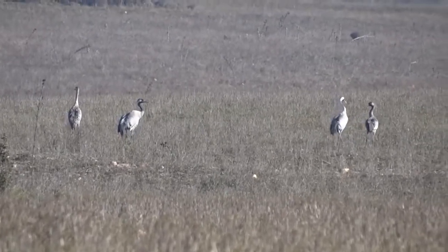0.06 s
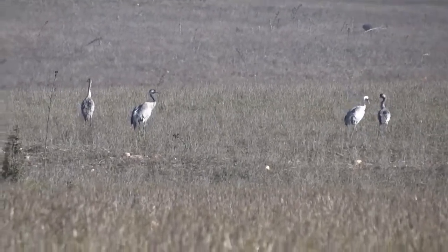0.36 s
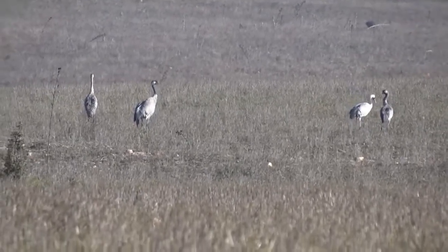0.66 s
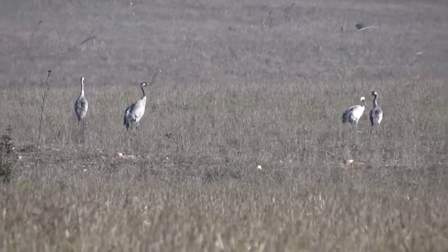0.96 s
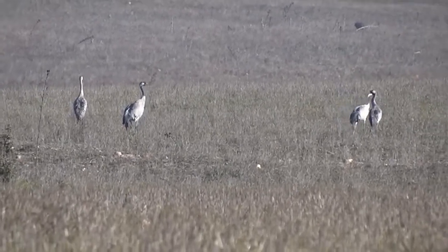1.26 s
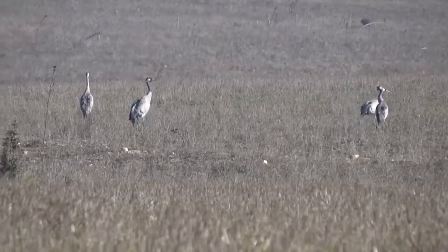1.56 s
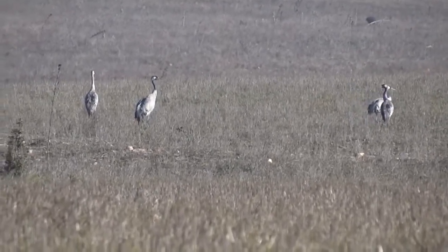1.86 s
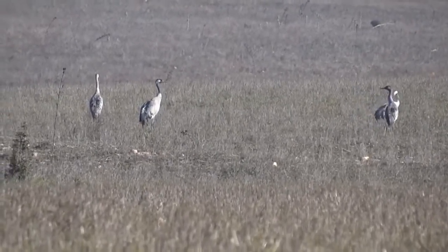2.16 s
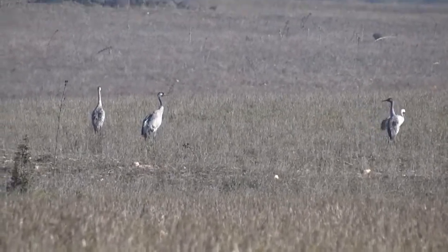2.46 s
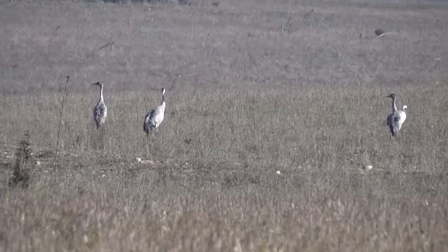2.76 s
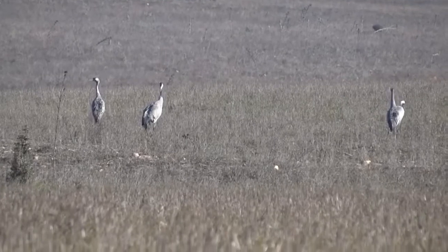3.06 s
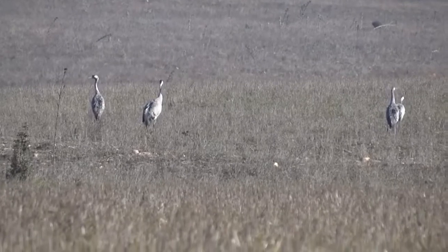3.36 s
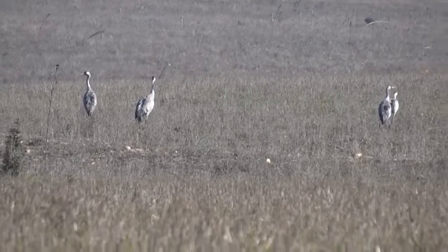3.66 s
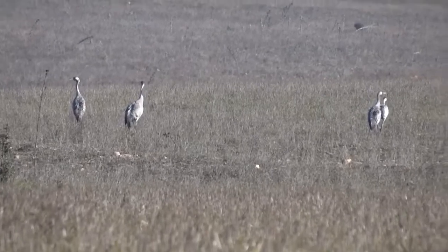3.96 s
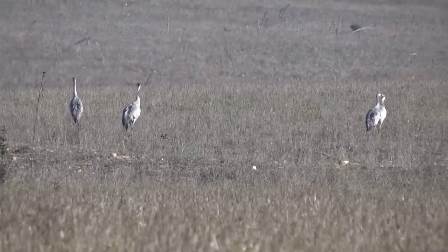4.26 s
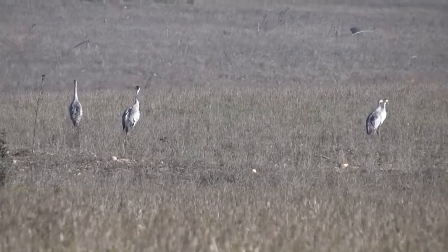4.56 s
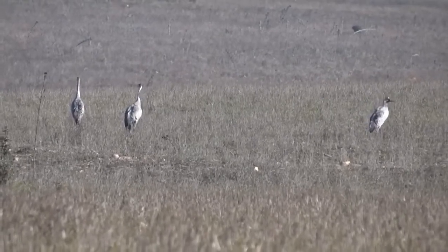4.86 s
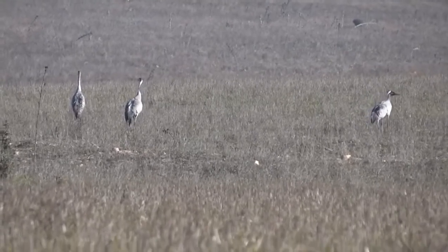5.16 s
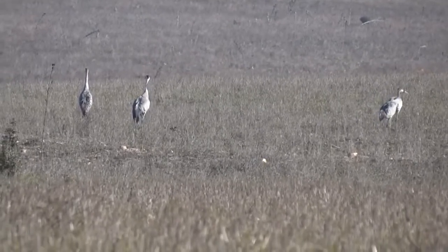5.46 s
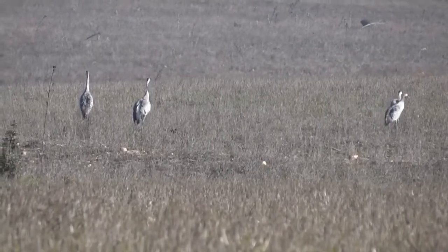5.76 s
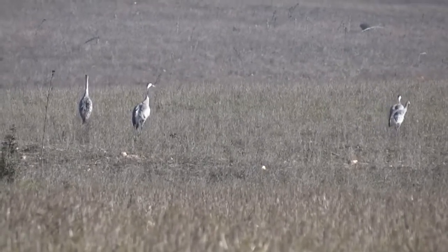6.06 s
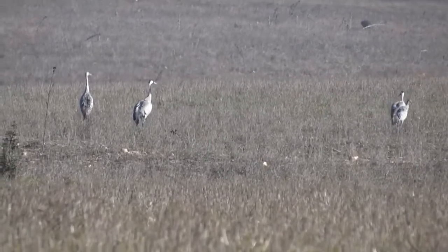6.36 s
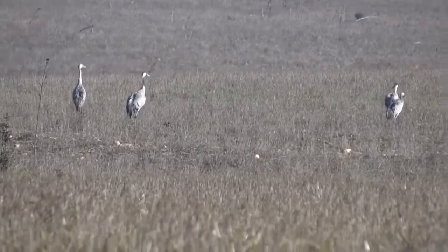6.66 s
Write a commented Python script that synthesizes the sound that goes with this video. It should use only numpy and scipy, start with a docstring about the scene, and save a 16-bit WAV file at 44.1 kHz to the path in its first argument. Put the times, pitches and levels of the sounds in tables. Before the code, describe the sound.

A crane clucks harshly in pairs and short rattles in an open field, while a lark and small birds whistle further off.

```python
"""A ground bird clucks harshly in an open field, in pairs and in rattles, just overloading the microphone. Its
voice is a source and a filter: uneven membrane slaps ring the throat, and turbulent air adds a rasp. A lark
whistles arched, nearly pure tones, and small birds chirp, tick and buzz further off; all of these sound again,
the same, 4.2 s later. The field scatters the calls back, over a thin twitter and a faint hiss."""
import sys
import numpy as np
from scipy import signal
from scipy.fft import rfft, irfft
from scipy.io import wavfile
from scipy.ndimage import uniform_filter1d, map_coordinates

SR = 44100
rng = np.random.default_rng(int(sys.argv[2]) if len(sys.argv) > 2 else 0)


def write(x):
    x = np.atleast_2d(x).T
    wavfile.write(sys.argv[1], SR, np.round(np.clip(x, -1, 1) * 32767).astype(np.int16))


N = 305172
TIME = np.arange(N) / SR

# spectrum of the background air: frequency_hz, relative_density_db
AIR_SPECTRUM = [(30, -30), (240, -25), (310, -21), (410, -9.5), (560, -16.5), (800, -4), (1200, -1),
                (1750, -7), (2100, -13.5), (3200, -14), (4200, -15), (4780, -4.5), (5200, -14.5),
                (5900, -16.5), (7600, -25.5), (15500, -24.5)]
# bands of far-off birds: centre_hz, width_hz, level_db
CHORUS_BANDS = [(1035, 87, -43), (1397, 150, -46), (1644, 90, -45.5), (3870, 320, -57)]
# falling chirps: start_s, length_s, middle_hz, level_db
CHIRPS = [(0.009, 0.032, 4990, -33), (1.65, 0.0198, 4140, -31.5), (2.251, 0.029, 3950, -26),
          (2.974, .035, 4785, -15)]
# dry ticks: time_s, level_db
TICKS = [(0.038, -28), (.527, -30.5), (0.588, -29), (.675, -40), (.718, -34), (.788, -37), (.925, -30.5),
         (.967, -42), (2.372, -38), (3.737, -38)]
# buzzy notes: start_s, length_s, centre_hz, width_hz, level_db
BUZZES = [(0.26, 0.11, 4970, 2300, -37), (2.567, 0.015, 5964, 700, -39.5), (2.568, 0.047, 3640, 592, -39.5),
          (2.572, .036, 5070, 1187, -42.5), (3.819, 0.054, 6180, 1100, -37.5)]
# the lark's arches (bow under 1 is pointed, over 1 flat-topped; top_db precedes the beak resonance):
# start_s, rise_s, fall_s, first_hz, top_hz, last_hz, bow, top_db
LARK_NOTES = [(1.162, .033, 0.11, 2820, 2798, 2326, .5, -22),
              (1.316, 0.019, .012, 3253, 3680, 3470, 1.4, -32),
              (1.362, 0.031, 0.057, 3170, 3625, 2315, 3.13, -13),
              (1.453, 0.054, 0.12, 2400, 3274, 2756, 1.3, -18),
              (2.899, 0.025, 0.069, 3260, 3587, 2387, .85, -16.5),
              (3.1, 0.03, .016, 2510, 3180, 2712, 1.092, -18),
              (3.143, 0.017, 0.032, 2660, 3020, 2550, 2.2, -23),
              (3.239, 0.016, .08, 3710, 5180, 2520, .62, -4.5),
              (3.336, .046, 0.061, 2573, 3467, 2445, 5.5, -16),
              (3.502, 0.037, 0.034, 3490, 4354, 3380, 0.88, -10.5),
              (3.575, .05, .042, 3300, 3750, 2430, 1.5, -19.5)]

# the ground bird's throat resonances at the neutral voicing: centre_hz, width_hz, gain_db
THROAT_MODES = [(700, 154, -16), (872.5, 130, -9.5), (1169.6, 131.5, 10), (1339, 190, -4.5),
                (1514, 217, 5.5), (1639, 55, -13), (1698, 110, -24)]
NEUTRAL_HZ = 1290  # a voicing above this raises and brightens the throat resonances
# upper resonances that the rasp excites: centre_hz, width_hz, gain_db
RASP_MODES = [(2644, 890, -2), (3380, 370, 7), (3950, 250, -4.5), (5440, 340, 3), (5873, 350, 3)]
# double clucks (here and below, levels and rasps are relative from call to call):
# start_s, gap_s, length_s, level_db, second_level_db, rasp_db, voicing_hz, swell_db
CLUCK_PAIRS = [(0.06, .114, 0.024, -6.5, -9.5, -29, 1342, -7.5),
               (.619, .129, 0.022, -12.5, -10.5, -32, 1255, 4),
               (2.125, 0.11, .028, -9, -8.5, -28, 1274, 3.5),
               (2.664, 0.11, 0.025, -7, -8.5, -29.5, 1295, -3),
               (3.912, 0.12, 0.028, -7.5, -10.5, -26, 1320, 5),
               (4.452, .108, 0.025, -7, -9, -25.5, 1270, 0.5),
               (5.672, 0.11, 0.025, -5.5, -5.5, -27, 1403, 3),
               (6.151, .101, .031, -7, -8.5, -23.5, 1276, 0.5)]
# hard single clucks before a rattle: start_s, length_s, level_db, rasp_db, swell_db, voicing_hz
LEAD_INS = [(1.066, 0.038, -11.5, -28.5, 0, 1210), (1.31, 0.038, -9.5, -27, -5, 1253),
            (1.488, .023, -8, -20, 3, 1258), (3.04, .027, -8, -25.5, 0, 1234),
            (3.214, 0.028, -8, -17.5, -10, 1312), (4.834, .033, -8.5, -23.5, 0.5, 1213),
            (4.998, 0.032, -9.5, -15.5, -5.5, 1315), (6.453, .036, -6, -18.5, -9.5, 1290)]
# long, beating calls: start_s, length_s, level_db, rasp_db, swell_db, voicing_hz
RATTLES = [(1.612, .11, -11.3, -22, -1.5, 1290), (3.367, .14, -10, -21, -1, 1297),
           (5.145, .14, -10, -18.5, 5, 1262), (6.59, .15, -9, -18.5, 10.5, 1359)]


def undb(db):
    """Decibels to amplitude ratio."""
    return 10 ** (np.asarray(db) / 20)


def unit(x):
    """Normalisation to rms 1."""
    return x / np.sqrt(np.mean(x ** 2) + 1e-18)


def add(track, start_s, sound):
    """Superposition: a sound sums into a track from its start on."""
    i = max(int(start_s * SR), 0)
    track[i:i + len(sound)] += sound[:N - i]


def band(x, low_hz, high_hz, order=2):
    """Butterworth band-pass filtering."""
    return signal.sosfilt(signal.butter(order, [low_hz, high_hz], "bandpass", fs=SR, output="sos"), x)


def resonate(x, hz, width_hz):
    """Resonance: two like resonators in cascade, with gain 1 at the centre."""
    peak = signal.iirpeak(hz, hz / width_hz, fs=SR)
    return signal.lfilter(*peak, signal.lfilter(*peak, x))


def wander(rate_hz, size):
    """Random modulation: smoothed noise of spread near 1."""
    hold = int(SR / rate_hz)
    steps = np.repeat(rng.standard_normal(size // hold + 1), hold)
    return 1.3 * uniform_filter1d(uniform_filter1d(steps, hold), hold)[:size]


def bend(x, speed):
    """Time warping slides all frequencies of a sound together."""
    return map_coordinates(x, [np.cumsum(speed)], order=3, mode="mirror")


def air(level_db=-40):
    """Spectrally shaped noise: the steady hiss of open air."""
    hz, db = np.transpose(AIR_SPECTRUM)
    colour = undb(np.interp(np.log(np.fft.rfftfreq(N, 1 / SR) + 1), np.log(hz), db))
    return undb(level_db) * unit(irfft(rfft(rng.standard_normal(N)) * colour, N))


def far_chorus(flicker_db=5.5):
    """Amplitude-modulated noise bands: far-off birds merge into a flickering blur."""
    out = np.zeros(N)
    for hz, width_hz, db in CHORUS_BANDS:
        blur = band(rng.standard_normal(N), hz - width_hz / 2, hz + width_hz / 2)
        out += undb(db) * unit(blur * undb(flicker_db * wander(16, N)))
    return out


def air_absorption(x, cutoff_hz):
    """Absorption over distance takes the treble off a sound."""
    return signal.sosfilt(signal.butter(7, cutoff_hz, fs=SR, output="sos"), x)


def with_scatter(x, near_db, near_t60_s, far_db, far_t60_s, build_s=0.0035):
    """Scattering: decaying echoes from near grass and bushes and the far slope join the direct sound."""
    t = TIME[:2 * SR]
    response = np.zeros(len(t))
    for db, t60_s in ((near_db, near_t60_s), (far_db, far_t60_s)):
        envelope = undb(-60 * t / t60_s) * (1 - np.exp(-t / build_s))
        response += undb(db) * unit(rng.standard_normal(len(t)) * envelope) / np.sqrt(len(t))
    return x + signal.fftconvolve(x, response)[:N]


def whistle(hz, waver=0.0041, second_db=-19, third_db=-31):
    """Nearly sinusoidal oscillation with faint harmonics; the second weakens on high notes."""
    phase = 2 * np.pi * np.cumsum(hz * (1 + waver * wander(330, len(hz)))) / SR
    octave_db = second_db - 36 * np.log2(np.maximum(hz / 2400, 1))
    overtones = undb(octave_db) * np.sin(2 * phase) + undb(third_db) * np.sin(3 * phase)
    return np.sqrt(2) * (np.sin(phase) + overtones)


def glide(length_s, first_hz, middle_hz, last_hz, db):
    """Frequency modulation: a short whistle follows a parabola through three pitches."""
    progress = np.linspace(0, 1, int(length_s * SR))
    hz = np.polyval(np.polyfit([0, .5, 1], [first_hz, middle_hz, last_hz], 2), progress)
    return undb(db) * whistle(hz) * np.sin(np.pi * progress)


def chirp(length_s, hz, db, fall=0.163):
    """A linear sweep, from a fraction above the middle pitch to as far below it."""
    return glide(length_s, hz * (1 + fall), hz, hz * (1 - fall), db)


def twitter(count=135, length_s=.024, level_db=-43, spread_db=5, pitch_hz=4750):
    """Jittered sweeps: tiny falling notes of far-off songbirds, every third from a lower voice."""
    out = np.zeros(N)
    for k, (when, detune, drop, strength) in enumerate(rng.uniform(-1.1, 1, (count, 4))):
        voice_ratio, voice_db = (.8, -2) if k % 3 == 0 else (1, 0)
        hz = voice_ratio * pitch_hz * (1 + .07 * detune)
        note = chirp(length_s, hz, level_db + voice_db + spread_db * strength, fall=.07 + .04 * drop)
        add(out, (k + .5 + when / 2) / count * N / SR, note)
    return out


def buzz(length_s, hz, width_hz, db, climb=0.27):
    """Fast amplitude modulation roughens a band of noise as it climbs in pitch."""
    size = int(length_s * SR)
    noise = band(rng.standard_normal(size), hz - width_hz / 2, hz + width_hz / 2, order=4)
    rough = noise * undb(4.4 * wander(113, size))
    rising = bend(rough, 1 + climb * np.linspace(-.5, .5, size))
    return undb(db) * unit(rising * signal.windows.tukey(size, .5))


def small_birds(run_start_s=1.9, run_step_s=.0915):
    """Sweeps and noise bands further out: chirps, an even run of them, a scoop, ticks and buzzes."""
    out = np.zeros(N)
    for start_s, *note in CHIRPS:
        add(out, start_s, chirp(*note))
    for k in range(4):
        add(out, run_start_s + k * run_step_s, chirp(length_s=0.0159, hz=3950, db=-33.5))
    scoop = glide(length_s=.045, first_hz=4500, middle_hz=3440, last_hz=5270, db=-28)
    add(out, .996, scoop)
    for time_s, db in TICKS:  # an upward flick this fast is heard as a tick
        add(out, time_s - .003, glide(0.00496, 5150, 5580, 7550, db))
    for start_s, *note in BUZZES:
        add(out, start_s, buzz(*note))
    return out


def repeated(song, period_s=4.198):
    """Repetition: the song sounds again one period later."""
    out = song.copy()
    add(out, period_s, song)
    return out


def arch(rise_s, fall_s, first_hz, top_hz, last_hz, bow):
    """The pitch contour of a note: a cosine-power rise and a power-law fall."""
    up = np.cos(np.linspace(0, np.pi / 2, int(rise_s * SR))) ** (2 * np.sqrt(bow))
    down = np.linspace(0, 1, int(fall_s * SR)) ** bow
    return top_hz + np.concatenate([(first_hz - top_hz) * up, (last_hz - top_hz) * down])


def beak_gain(hz, centre_hz=4360, width_hz=150, peak_db=8):
    """Resonance: the whistle blooms where its pitch crosses that of the beak."""
    return undb(peak_db / (1 + ((hz - centre_hz) / (width_hz / 2)) ** 2))


def lark(db_per_octave=25, fade_db=1, slur_s=.009, attack_s=0.01, ceiling_db=-6.5,
         quaver_start_s=3.573, quaver_rate_hz=54, quaver_depth_hz=330):
    """Pitch and level rise together with pressure in slurred, arched notes; the last one quavers."""
    pitch, singing, gain = np.zeros((3, N))
    for start_s, rise_s, fall_s, first_hz, top_hz, last_hz, bow, db in LARK_NOTES:
        hz = arch(rise_s, fall_s, first_hz, top_hz, last_hz, bow)
        air_spent = np.maximum(TIME[:len(hz)] - rise_s, 0) / fall_s
        add(pitch, start_s, hz)
        add(singing, start_s, np.ones(len(hz)))
        add(gain, start_s, undb(db + db_per_octave * np.log2(hz / top_hz) - fade_db * air_spent))
    pitch, singing, gain = uniform_filter1d(np.array([pitch, singing, gain]), int(slur_s * SR))
    quaver = np.sin(2 * np.pi * quaver_rate_hz * np.maximum(TIME - quaver_start_s, 0))
    hz = pitch / np.maximum(singing, 1e-6) - quaver_depth_hz * quaver
    pole = np.exp(-1 / (attack_s * SR))
    build_up = signal.lfilter([1 - pole], [1, -pole], singing)
    return np.minimum(gain * build_up * beak_gain(hz), undb(ceiling_db)) * whistle(hz)


def syrinx(size, pulse_hz=310, jitter=0.19, shimmer_db=5.0, turbulence=0.036):
    """Impulse excitation: membrane slaps, uneven in spacing and strength, with a little air noise."""
    spacing, strength = rng.standard_normal((120, 2)).T
    periods = np.cumsum(np.exp(jitter * spacing)) - 1
    at = np.maximum(periods * SR / pulse_hz, 0).astype(int)
    slaps = np.zeros(size)
    slaps[at[at < size]] = undb(shimmer_db * strength[at < size])
    return slaps + turbulence * rng.standard_normal(size)


def throat(size, voicing_hz):
    """Formant filtering: slaps ring the throat; a higher voicing (a wider beak) favours upper modes."""
    run_in = SR // 50
    slaps = syrinx(size + 2 * run_in)
    tilt_db_per_octave = 2.5 * (voicing_hz - NEUTRAL_HZ) / 60
    tone = 0
    for k, (hz, width_hz, db) in enumerate(THROAT_MODES):
        gain = undb(db + tilt_db_per_octave * np.log2(hz / NEUTRAL_HZ))
        tone += (-1) ** k * gain * resonate(slaps, hz, width_hz)
    return tone[run_in:]


def rasp(size, leak=0.0056):
    """Turbulence: air tearing past the membranes excites the upper resonances."""
    noise = rng.standard_normal(size)
    rung = sum(undb(db) * resonate(noise, hz, width_hz) for hz, width_hz, db in RASP_MODES)
    return band(rung + leak * noise, low_hz=2350, high_hz=6200, order=8)


def saturate(x):
    """Saturation: the membranes swing only so far, so slow swells level out and roughness stays."""
    power = uniform_filter1d(uniform_filter1d(unit(x) ** 2, size=150), size=150)
    return unit(x / np.sqrt(power + .08))


def cluck(length_s, rasp_db, swell_db, voicing_hz,
          attack_s=0.0093, release_s=0.012, ring_s=0.0055, flutter_hz=61, rasp_boost_db=5):
    """Source and filter under one push of air; deep modulation breaks a long push into a rattle."""
    t = np.arange(int((length_s + .03) * SR)) / SR
    progress = np.minimum(t / length_s, 1)
    beat_phase = 2 * np.pi * (flutter_hz * (t - 0.0069) + 0.054 * wander(44.8, len(t)))
    if length_s > .07:  # a rattle, whose beats finally run together into a falling croak
        croak = progress ** 4
        flutter_db, rasp_fade_db = 7 * (1 - croak), -16
    else:
        croak, flutter_db, rasp_fade_db = 0, 2.03, -10
    push = np.clip(t / attack_s, 0, 1) ** 2 * np.clip((length_s + attack_s / 2 - t) / release_s, 0, 1)
    push *= undb(flutter_db * (np.cos(beat_phase) + .2 * wander(60, len(t))))
    envelope = signal.lfilter([1], [1, -np.exp(-2 / (ring_s * SR))], push)
    # the resonances sink through the call, and again within every beat
    sag = 1 + 0.0428 * (.5 - progress) - 0.0165 * np.sin(beat_phase) - 0.057 * croak
    tone = bend(throat(len(t), voicing_hz), sag * (voicing_hz / NEUTRAL_HZ) ** 0.292)
    tone = saturate(tone) * envelope * undb(swell_db * progress)
    tone = band(tone, low_hz=650, high_hz=1850, order=7)
    edge = saturate(bend(rasp(len(t)), sag)) * envelope * undb(rasp_fade_db * progress)
    edge = np.roll(edge, int(.001 * SR))  # the rasp lags the tone
    return (unit(tone) + undb(rasp_db + rasp_boost_db) * unit(edge)) * np.sqrt(length_s / t[-1])


def ground_bird(gain_db=-0.33, early_s=.0052):
    """Pulsed airflow makes double clucks, single ones and rattles."""
    out = np.zeros(N)
    # each call starts a few milliseconds early, so its soft onset swells into the listed time
    for start_s, gap_s, length_s, db, second_db, rasp_db, voicing_hz, swell_db in CLUCK_PAIRS:
        # the second cluck is longer, smoother and lower
        second = cluck(length_s * 1.234, rasp_db - 2, swell_db, voicing_hz * 0.94)
        first = cluck(length_s, rasp_db, swell_db, voicing_hz)
        add(out, start_s - early_s, undb(db) * first)
        add(out, start_s + gap_s - early_s, undb(second_db) * second)
    for start_s, length_s, db, *voice in LEAD_INS + RATTLES:
        add(out, start_s - early_s, undb(db) * cluck(length_s, *voice))
    return undb(gain_db) * out


def scene():
    """Superposition of three kinds of bird, direct and scattered, over the air and the far chorus."""
    clucks = with_scatter(ground_bird(), near_db=-12.5, near_t60_s=0.5, far_db=-16, far_t60_s=0.75)
    song = air_absorption(repeated(lark()), cutoff_hz=8500)
    song = with_scatter(song, near_db=-13.5, near_t60_s=0.53, far_db=-13, far_t60_s=0.33)
    others = air_absorption(repeated(small_birds()) + twitter(), cutoff_hz=9000)
    others = with_scatter(others, near_db=-7, near_t60_s=0.22, far_db=-9, far_t60_s=0.8)
    return (clucks + song + others + air() + far_chorus())[None]


def record(dry):
    """Overload and band limiting: the loudest peaks clip at full scale, and the top is cut."""
    low_pass = signal.ellip(10, .1, 60, 15850, fs=SR, output="sos")
    return signal.sosfilt(low_pass, np.clip(dry, -1, 1))


dry = scene()
out = record(dry)
write(out)
```